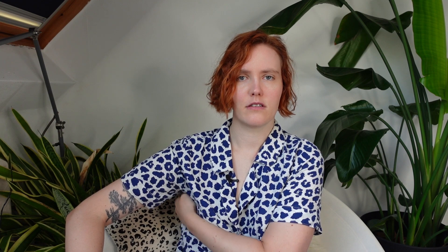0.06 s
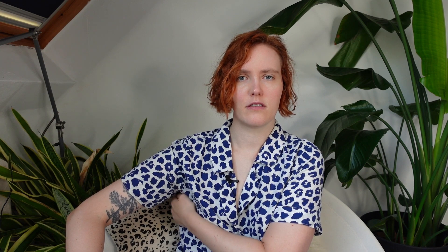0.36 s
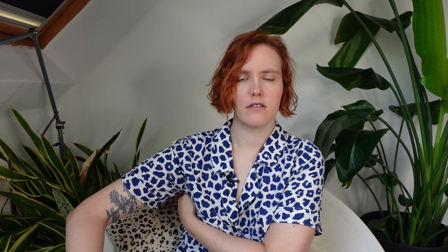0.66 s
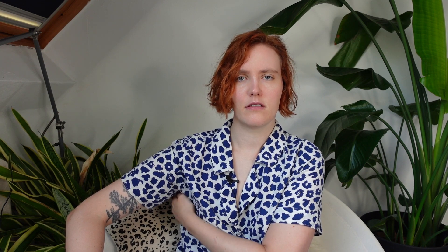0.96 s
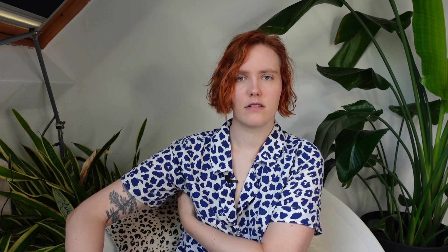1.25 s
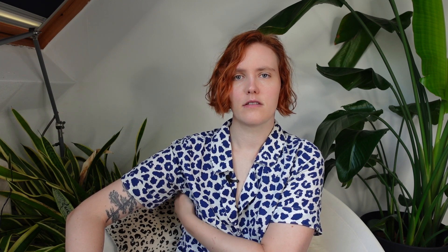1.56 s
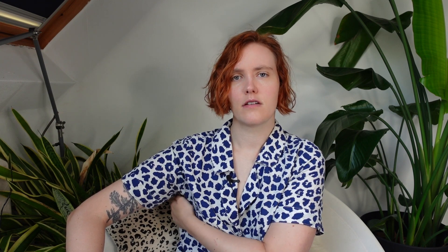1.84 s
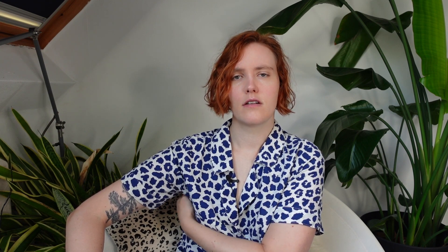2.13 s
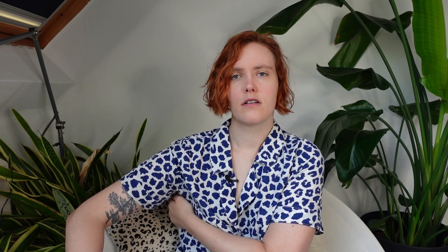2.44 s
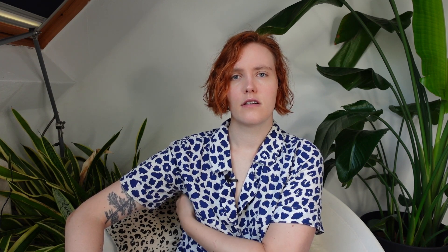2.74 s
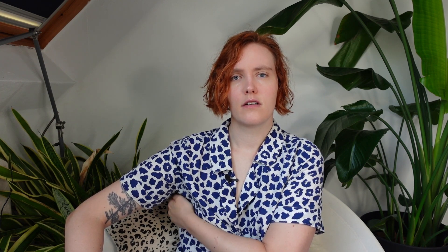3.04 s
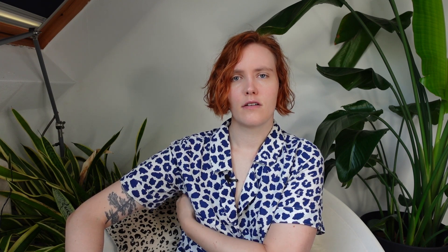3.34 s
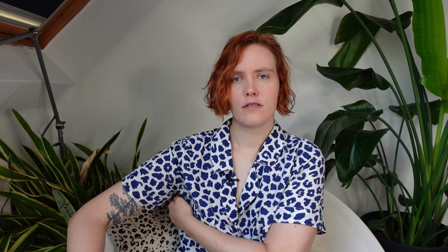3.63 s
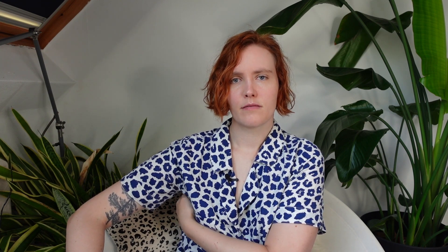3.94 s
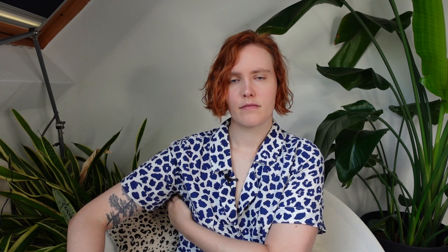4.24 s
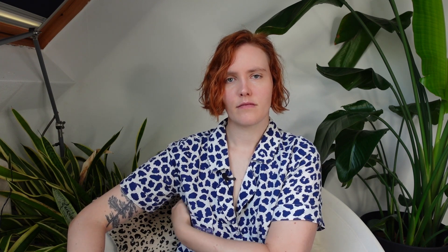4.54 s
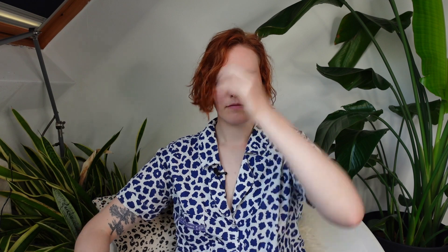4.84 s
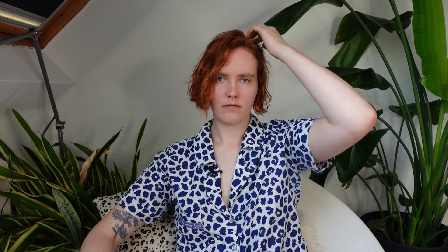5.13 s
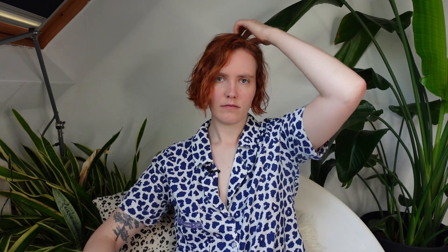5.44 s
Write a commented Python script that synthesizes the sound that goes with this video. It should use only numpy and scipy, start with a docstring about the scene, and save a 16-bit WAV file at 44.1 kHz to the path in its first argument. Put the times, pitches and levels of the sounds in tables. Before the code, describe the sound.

Fingertips tap steadily on a chest through a shirt, with soft thumps and faint cloth rustle, then stop in a quiet room.

```python
"""Fingertips tap the side of a chest through a light shirt, about five times a second, near a microphone.
Each impact drives the ribs as a damped oscillator (a thump), rings the air trapped under the fingers
(a pop) and snaps the cloth; a small room adds reflections and standing waves. Friction makes the sleeve
rustle throughout; at the end the arm swishes up, the shirt nudges the microphone and quiet room remains."""
import sys
import numpy as np
from scipy import signal
from scipy.fft import rfft, irfft, next_fast_len
from scipy.io import wavfile

SR = 44100
rng = np.random.default_rng(int(sys.argv[2]) if len(sys.argv) > 2 else 0)


def bounce(signal):
    """Save signal as a 16-bit WAV file at the path given by the first command-line argument."""
    frames = np.transpose(np.atleast_2d(signal))
    limited = np.clip(frames, -1, 1)
    pcm = np.round(limited * 32767).astype(np.int16)
    wavfile.write(sys.argv[1], SR, pcm)


N = 250576
TIME = np.arange(N) / SR
CONTACT_TIME = np.arange(-1500, 2600) / SR  # seconds from the moment of contact

# Base friction noise of the arm, tapping, lifting, then resting: time_s, hiss_db, rumble_db
SLEEVE_LEVELS = [(0, -74, -62), (.8, -65, -63), (4.521, -64, -61.5), (4.62, -58.5, -52),
                 (4.95, -71.5, -57.5), (5.14, -94, -67), (5.4, -100, -93), (5.68, -100, -80.5)]
# Spectra of sleeve hiss, sleeve rumble, room air, cloth snap and skid: frequency_hz, density_db
HISS_SPECTRUM = [(400, 1), (1000, 0), (1600, 3.5), (2100, -1.5), (2750, 1.5), (3300, -6), (3900, -0.5),
                 (5000, -9), (6200, -13.5), (7500, -24.5), (10000, -30), (16000, -46)]
RUMBLE_SPECTRUM = [(20, -5.5), (45, -18.5), (80, 0), (170, -1), (270, -2.5), (350, -4.5), (500, -3.5),
                   (700, -11), (1200, -11.5), (2000, -17.5), (4000, -53)]
AIR_SPECTRUM = [(20, -20), (90, 0), (170, 0), (250, 9), (350, -6), (530, 7), (700, -29.5), (1100, -12),
                (1800, -43), (3000, -47.5), (8000, -41), (16000, -40)]
SNAP_SPECTRUM = [(900, -12.5), (1800, 7.5), (2300, 5.5), (2750, 4.5), (3300, -7), (3900, 1), (4700, -6.5),
                 (5800, -8), (7200, -19.5), (9500, -37), (15000, -54.5)]
SKID_SPECTRUM = [(3000, -11.5), (6000, 3.5), (9000, 5), (14000, -2), (16000, 6)]
# Finger impacts on the chest:
# time_s, thump_hz, thump_db, knock_hz, knock_db, pop_db, clap_db, snap_db, snap_tilt_db_per_octave
TAPS = [(0.0494, 255, -24.5, 620, -32, -26, -45, -50.5, -10),
        (0.2414, 175, -25.5, 640, -35.5, -24.5, -45.5, -43, 2.5),
        (0.4607, 203, -24, 690, -30.5, -28, -39, -44.5, -5.5),
        (0.6818, 215, -30.5, 560, -32, -25, -28.5, -33.5, 0),
        (0.896, 189, -25.5, 680, -29, -27.5, -31.5, -40.5, 3),
        (1.1065, 180, -26.5, 570, -35, -25, -40, -44, -3),
        (1.3087, 222, -17.5, 640, -37, -26.5, -35, -41.5, -0.5),
        (1.523, 205, -25, 700, -34, -32.5, -37, -33, -1.5),
        (1.7476, 260, -26, 580, -27.5, -27, -35.5, -44.5, -7),
        (1.9374, 212, -19, 745, -28.5, -31, -30, -34, 3.5),
        (2.1375, 230, -26.5, 640, -27.5, -29.5, -41, -42, 0),
        (2.34, 280, -19, 690, -28.5, -30.5, -31, -35.5, 2.5),
        (2.5504, 235, -24.5, 600, -51, -26, -31.5, -43, 3),
        (2.7638, 180, -34, 560, -26.5, -33.5, -43, -36.5, 1),
        (2.9626, 213, -21, 590, -31.5, -27, -47, -42.5, -2),
        (3.1641, 184, -21, 550, -27.5, -25, -54.5, -36.5, 1.5),
        (3.3647, 240, -24, 550, -25, -25.5, -32.5, -36, -7),
        (3.566, 196, -24.5, 640, -39.5, -28.5, -30, -39.5, 0.5),
        (3.7627, 185, -22.5, 720, -34.5, -36.5, -37.5, -41, -7),
        (3.9623, 165, -24, 630, -29.5, -39.5, -34.5, -41, -9),
        (4.1836, 154, -26.5, 515, -27, -33.5, -29, -37, -6.5),
        (4.3564, 180, -24, 620, -27, -37, -37, -36, -1.5),
        (4.5401, 290, -32, 510, -26.5, -36, -34.5, -39, -4.5)]
# Short echo paths off arm and furniture: delay_s, gain_db
REFLECTIONS = [(.0047, -15.5), (.00567, -18.5), (.0099, -21.5), (0.013, -26), (0.0212, -39.5), (0.045, -29)]
# Diffuse reverberation by band: frequency_hz, gain_db, t60_s
ROOM_BANDS = [(59.6, -8, 0.097), (123.8, -29, 0.71), (265, -17, 0.27), (503, -16.5, 0.29), (900, -14, 0.34),
              (1100, -17.5, 0.31), (1580, -16, 0.3), (2410, -9, 0.18), (4120, -6.5, 0.091),
              (6900, -6, 0.18), (13920, -6, .26)]
# Standing waves of the room: pitch_hz, gain_db, t60_s
ROOM_MODES = [(72.6, -5.5, 0.6), (251.6, -6, 0.24), (370, -6, 0.32), (556, -14, 0.36), (637, -10, 0.99),
              (808, -8.5, 0.59), (1097, -12.5, 0.5), (1330, -8, 0.3), (1730, -10, 0.12)]
# Fingers slipping as they land: time_s, level_db, fall_s, tilt_db_per_octave
SKIDS = [(0.684, -47.5, .008, -12.5), (1.526, -42.5, 0.017, 8.5)]
# Stray touches, mostly shirt on microphone: time_s, pitch_hz, thud_db, tick_db
NUDGES = [(1.526, 62.6, -39, -43), (1.632, 129, -51, -61), (2.054, 148, -51.5, -56),
          (4.2814, 437, -51.5, -53.5), (4.538, 93.6, -32, -41), (4.946, 950, -54, -65),
          (5.132, 77.6, -52, -96), (5.317, 60.8, -64.5, -92), (5.506, 125, -54, -94)]
# Cloth and fingers brushing past: peak_s, centre_hz, half_width_s, level_db
BRUSHES = [(4.515, 420, 0.037, -56), (4.615, 4500, 0.018, -58.5), (4.761, 9600, .025, -71),
           (4.834, 453, 0.032, -51.5), (4.923, 438, 0.029, -55.5), (5.499, 264.6, .02, -65.5),
           (5.576, 1084, 0.03, -71.5)]


def undb(db):
    """Amplitude grows tenfold for every 20 dB."""
    return 10 ** (np.asarray(db) / 20)


def colour(x, spectrum, tilt_db=0):
    """Linear filtering: weight each frequency by a spectrum, its treble tilted by tilt_db an octave."""
    hz, db = np.transpose(spectrum)
    size = next_fast_len(len(x))
    bin_hz = np.maximum(np.fft.rfftfreq(size, 1 / SR), 1)
    db = db + tilt_db * np.log2(np.clip(hz, 2000, 12000) / 4000)
    gain = undb(np.interp(np.log(bin_hz), np.log(hz), db))
    return irfft(rfft(x, size) * gain, size)[:len(x)]


def noise(spectrum):
    """Filtered Gaussian noise of unit rms."""
    x = colour(rng.standard_normal(N), spectrum)
    return x / x.std()


def wander(rate_hz):
    """Random modulation: interpolated values with a deviation near 1."""
    knots = rng.standard_normal(N // 100)
    return np.sqrt(3 / 2) * np.interp(TIME * rate_hz, np.arange(len(knots)), knots)


def highpass(x, hz, order):
    """A causal Butterworth filter attenuates frequencies below hz."""
    return signal.sosfilt(signal.butter(order, hz, "high", fs=SR, output="sos"), x)


def at_level(x, db, window_s=0.01):
    """Equivalent level: scale a transient so that its energy, spread over window_s, gives db."""
    return x * undb(db) / np.sqrt(np.sum(x ** 2) / (window_s * SR))


def swell(rise_s, fall_s):
    """A soft contact grows exponentially to its peak, then decays exponentially."""
    return np.exp(np.minimum(CONTACT_TIME / rise_s, -CONTACT_TIME / fall_s))


def ring(hz, rise_s, fall_s):
    """A heavily damped resonance, softly excited."""
    return np.sin(2 * np.pi * hz * CONTACT_TIME) * swell(rise_s, fall_s)


def add(track, time_s, sound):
    """Superpose a transient on the track, its moment of contact at time_s."""
    at = int(round((time_s + CONTACT_TIME[0]) * SR)) + np.arange(len(sound))
    inside = (at >= 0) & (at < N)
    track[at[inside]] += sound[inside]


def sleeve(lift_s=0.13, lift_width_s=0.013, lift_db=3, drop_width_s=0.034, drop_db=4, taut_db=-39.5):
    """Sliding friction makes noise that swells as the hand drops and again as it lifts."""
    time_s, hiss_db, rumble_db = np.transpose(SLEEVE_LEVELS)
    tap_s, *_, snap_db, _ = np.transpose(TAPS)
    since_tap = TIME[::50, None] - tap_s
    lift = lift_db * np.exp(-((since_tap - lift_s) / lift_width_s) ** 2)
    drop = drop_db * np.exp(-(since_tap / drop_width_s) ** 2)
    stroke_db = np.interp(TIME, TIME[::50], (lift + drop).sum(axis=1))
    slack_db = 0.42 * np.interp(TIME, tap_s, snap_db - taut_db)  # slack cloth snaps and hisses more
    folds, fibres = wander(27), wander(400)  # folds shift slowly, single fibres catch quickly
    hiss_gain = undb(np.interp(TIME, time_s, hiss_db) + slack_db + stroke_db + 1.8 * folds + 1.1 * fibres)
    rumble_gain = undb(np.interp(TIME, time_s, rumble_db) + stroke_db + 0.36 * folds)
    return noise(HISS_SPECTRUM) * hiss_gain + noise(RUMBLE_SPECTRUM) * rumble_gain


def room_air(level_db):
    """The ambient field of a quiet room is stationary, mostly low-pitched noise."""
    return undb(level_db) * noise(AIR_SPECTRUM)


def chest_thump(hz, delay_s, push_cycles=0.18, damping_ratio=0.55):
    """A force pulse drives the chest as a damped mass on a spring; the slowest motion does not radiate."""
    push = -1 / (1 + ((CONTACT_TIME - delay_s) * hz / push_cycles) ** 2)
    omega = 2 * np.pi * 0.92 * hz
    spring = signal.bilinear([1, 0, 0], [1, 2 * damping_ratio * omega, omega ** 2], SR)
    return highpass(signal.lfilter(*spring, push), hz=35, order=1)


def air_pocket(modes, rise_s, fall_s):
    """Air trapped under the fingers rings as a cavity, a sum of damped modes."""
    return sum(at_level(ring(hz, rise_s, fall_s), db) for hz, db in modes)


def cloth(spectrum, rise_s, fall_s, tilt_db, grain_db=2.5):
    """Pinched fibres click at random and sum to a burst of grainy noise."""
    count = len(CONTACT_TIME)
    fibres = rng.standard_normal(count) * undb(grain_db * rng.standard_normal(count))
    return colour(fibres * swell(rise_s, fall_s), spectrum, tilt_db)


def taps(firm_db=-22, base_pop_hz=1210.6, clap_hz=1615, slap_time_ratio=0.76):
    """Each impact excites ribs, air pocket and cloth. Returns the near field and the slap sent to the room."""
    near, far = np.zeros(N), np.zeros(N)
    for time_s, thump_hz, thump_db, knock_hz, knock_db, pop_db, clap_db, snap_db, tilt_db in TAPS:
        delay_s = 0.0003 * (thump_db - firm_db)  # a heavy thump peaks after the pop, a light one before
        # The fingers land less together when the thump outweighs the pop.
        spread = 1.25 * np.exp(0.0243 * (thump_db - pop_db))
        # Flatter fingers clap more than they pop, and their smaller pocket rings higher.
        pop_hz = base_pop_hz * 2 ** (0.01 * (clap_db - pop_db))
        modes = [(knock_hz, knock_db), (pop_hz, pop_db), (clap_hz, clap_db)]
        rise_s, fall_s = 0.00083 * spread, 0.00115 * spread
        chest = at_level(chest_thump(thump_hz, delay_s), thump_db)
        shirt_sway = at_level(ring(hz=48, rise_s=0.0031, fall_s=0.013), thump_db - 23)
        pocket = air_pocket(modes, rise_s, fall_s)
        slap = air_pocket(modes, slap_time_ratio * rise_s, slap_time_ratio * fall_s)
        snap = at_level(cloth(SNAP_SPECTRUM, 0.0008 * spread, 0.0013 * spread, tilt_db), snap_db)
        late_finger = at_level(cloth(SNAP_SPECTRUM, 0.00048, 0.002, tilt_db), snap_db - 9.5)
        hand_settling = at_level(ring(hz=60, rise_s=0.004, fall_s=0.015), thump_db - 22.5)
        add(near, time_s, chest + shirt_sway + pocket + snap)
        add(near, time_s + 0.0045, late_finger)
        add(near, time_s + 0.0064, hand_settling)
        add(far, time_s, undb(-1) * chest + slap + snap)
    return near, far


def reverberation(x, build_s=0.0021, onset_s=0.0013):
    """Convolution with the room's response: diffuse bands and standing waves, each with its own decay."""
    t = np.arange(SR // 2) / SR
    hz, db, t60 = np.transpose(ROOM_BANDS)
    scatter, response = rng.choice([-1., 1.], len(t)), 0
    log_hz = np.log(np.maximum(np.fft.rfftfreq(len(t), 1 / SR), 1))
    build = 1 - np.exp(-np.maximum(t - onset_s, 0) / build_s)
    for share, band_db, t60_s in zip(np.eye(len(hz)), db, t60):
        band = irfft(rfft(scatter) * np.interp(log_hz, np.log(hz), share), len(t))
        fade = build * np.exp(-np.log(1000) * t / t60_s)
        response += undb(band_db) * band * fade / np.linalg.norm(fade)
    for mode_hz, mode_db, t60_s in ROOM_MODES:
        fade = build * np.exp(-np.log(1000) * t / t60_s)
        response += undb(mode_db) * 2 * np.sin(2 * np.pi * mode_hz * t) * fade / fade.sum()
    return signal.fftconvolve(x, response)[:N]


def reflections(x):
    """Arm and furniture reflect the short wavelengths, each delayed by its path."""
    bright = -highpass(x, hz=280, order=1)
    return sum(undb(db) * np.interp(TIME - delay_s, TIME, bright, left=0) for delay_s, db in REFLECTIONS)


def skids(rise_s=0.0015):
    """Friction of a slipping finger draws a bright zip from the fibres."""
    out = np.zeros(N)
    for time_s, db, fall_s, tilt_db in SKIDS:
        add(out, time_s, at_level(cloth(SKID_SPECTRUM, rise_s, fall_s, tilt_db), db))
    return out


def nudges(rise_cycles=0.33, fall_cycles=0.9):
    """Soft impacts of finger or shirt on the microphone give damped thuds, some with a tick of cloth."""
    out = np.zeros(N)
    for time_s, hz, thud_db, tick_db in NUDGES:
        thud = at_level(ring(hz, rise_cycles / hz, fall_cycles / hz), thud_db)
        tick = at_level(cloth(SNAP_SPECTRUM, 0.00056, 0.0017, tilt_db=-3.5), tick_db)
        add(out, time_s, thud + tick)
    return out


def brushes(edge_ratio=1.24):
    """Brief rubbing friction gives a grainy swell of narrow-band noise."""
    out = np.zeros(N)
    for peak_s, hz, half_width_s, db in BRUSHES:
        rub = noise([(hz / 4, -40), (hz / edge_ratio, -14), (hz, 0), (hz * edge_ratio, -14), (hz * 3, -55)])
        envelope = np.exp(-((TIME - peak_s) / half_width_s) ** 2)
        out += rub * undb(db + 2 * wander(150)) * envelope
    return out


def scene():
    """Sources superpose in the mid channel; faint uncorrelated rustle, air and room treble add width."""
    near, far = taps()
    touches = nudges() + skids()
    direct, into_room = near + touches, far + touches
    mid = direct + reflections(direct) + reverberation(into_room) + sleeve() + brushes() + room_air(-70)
    side = undb(-18) * sleeve() + room_air(-85)
    side += undb(-13) * highpass(reverberation(into_room), hz=4500, order=2)
    return np.array([mid + side, mid - side])


def record(dry, ceiling=0.53, cutoff_hz=15800):
    """Soft saturation rounds the tallest peaks; a steep low-pass limits the bandwidth."""
    rounded = dry / (1 + (dry / ceiling) ** 4) ** (1 / 4)
    return signal.sosfilt(signal.ellip(8, 0.2, 70, cutoff_hz, fs=SR, output="sos"), rounded)


dry = scene()
out = record(dry)
bounce(out)
```